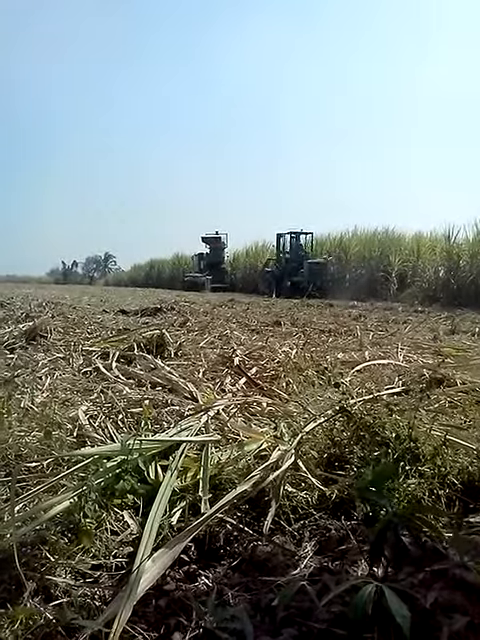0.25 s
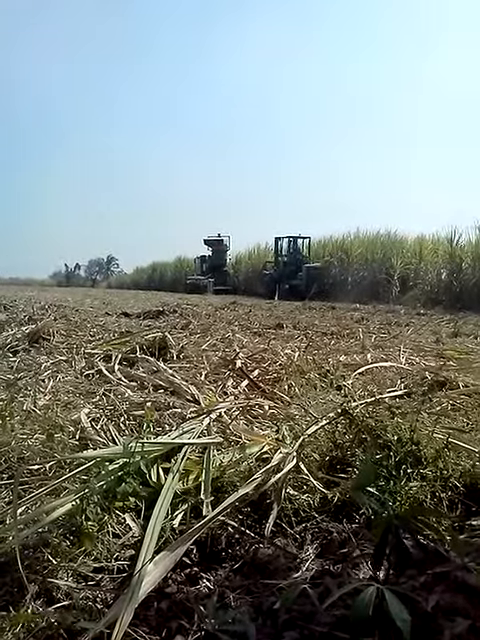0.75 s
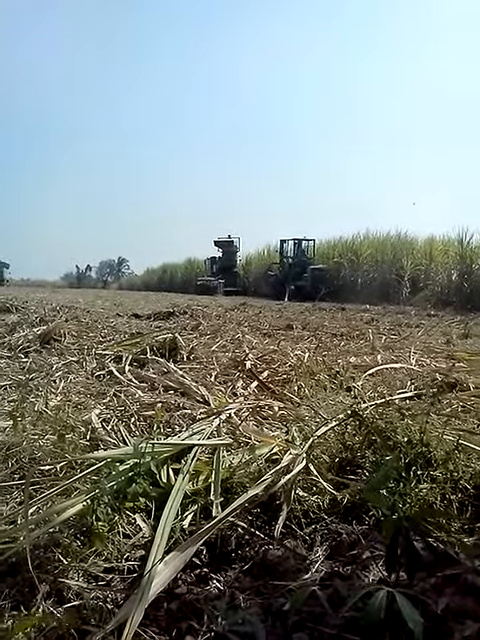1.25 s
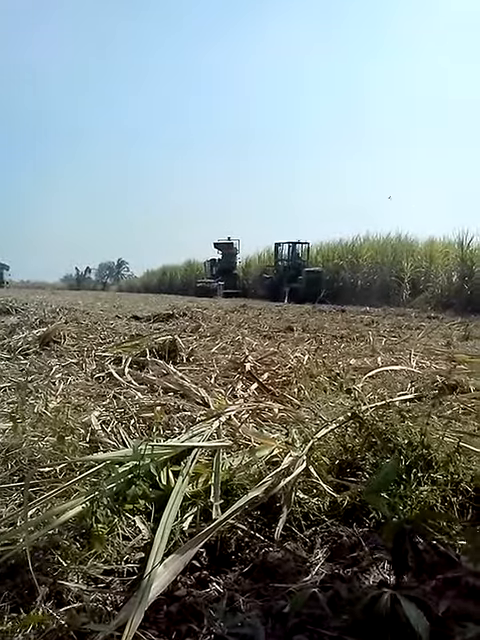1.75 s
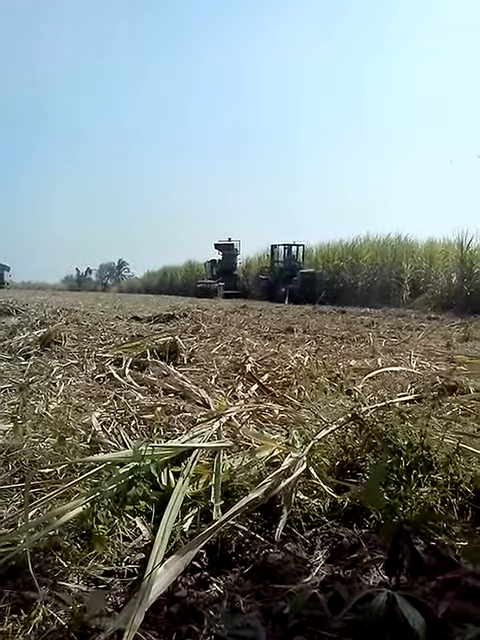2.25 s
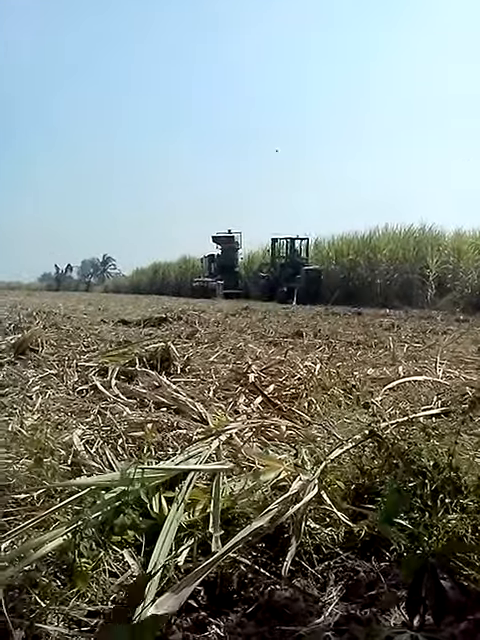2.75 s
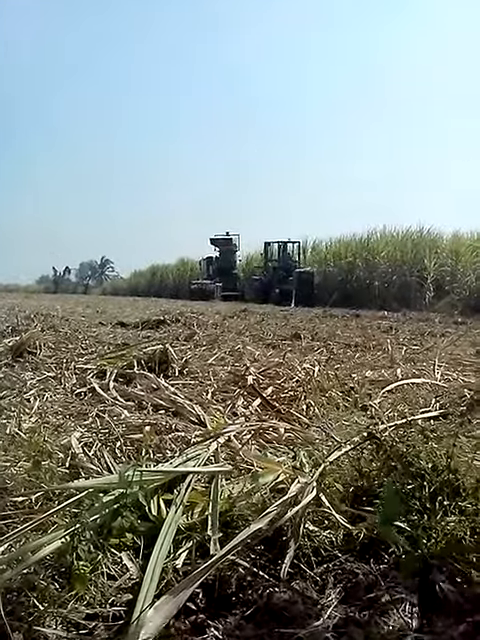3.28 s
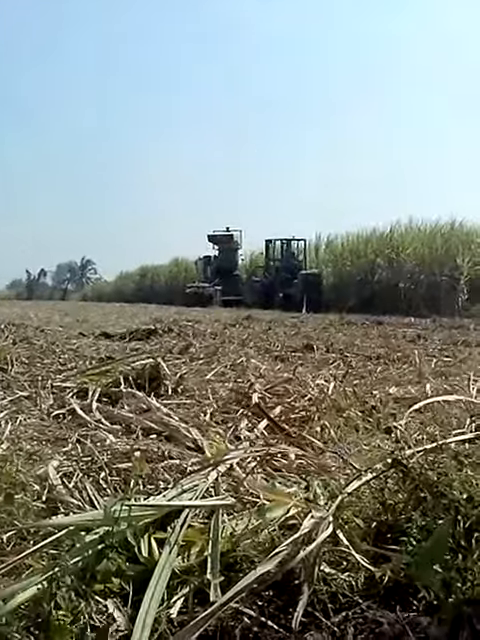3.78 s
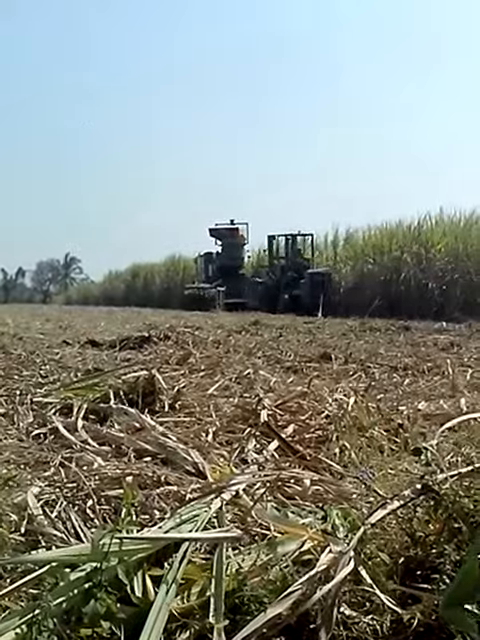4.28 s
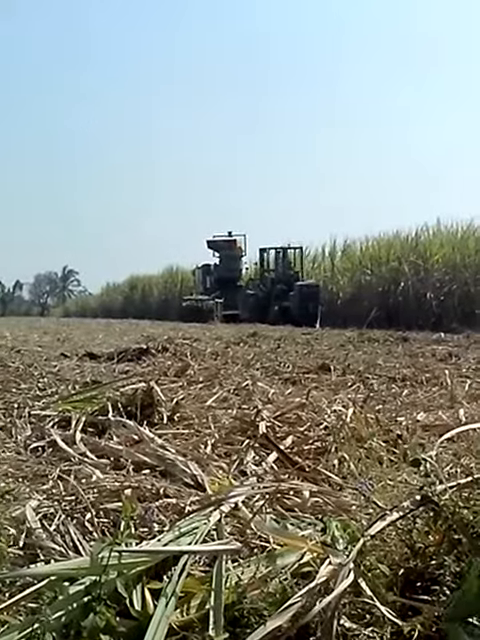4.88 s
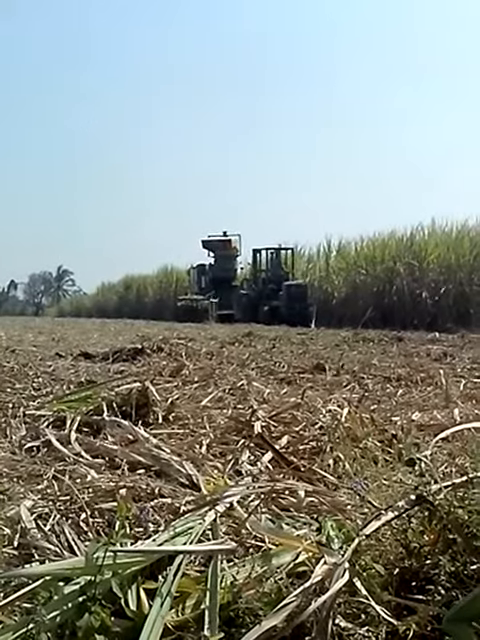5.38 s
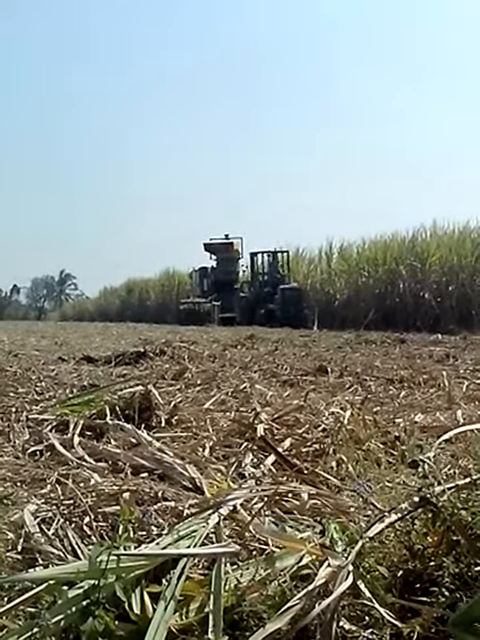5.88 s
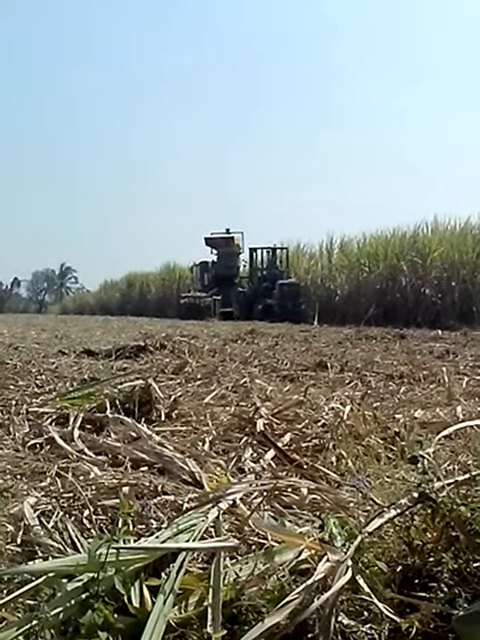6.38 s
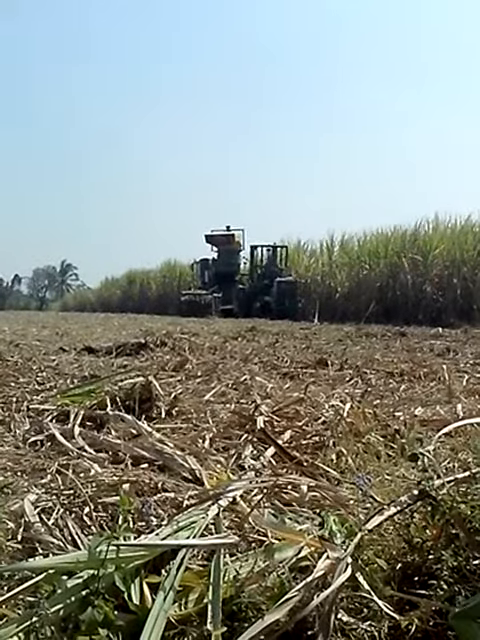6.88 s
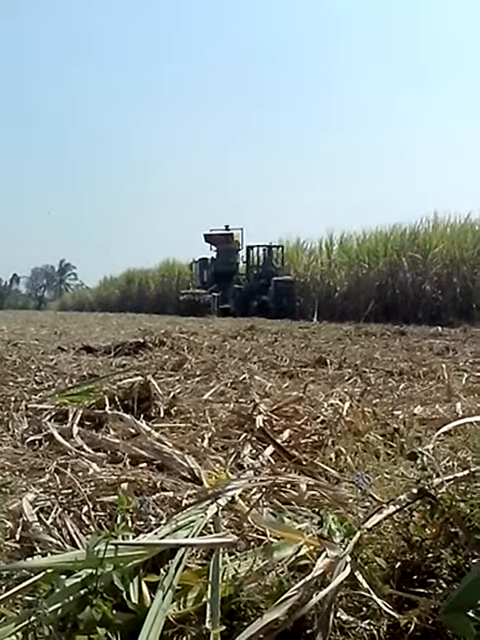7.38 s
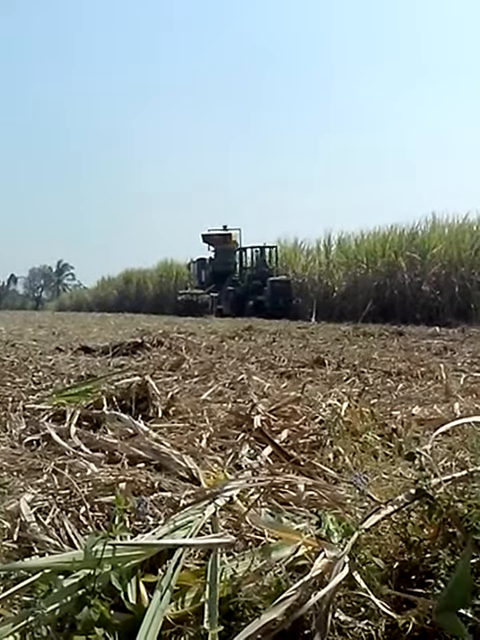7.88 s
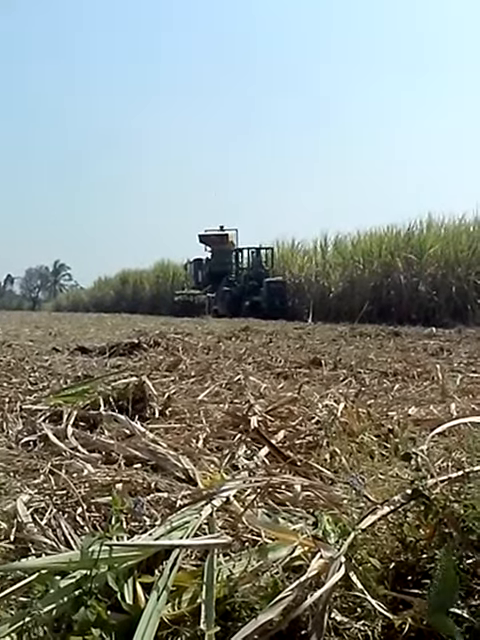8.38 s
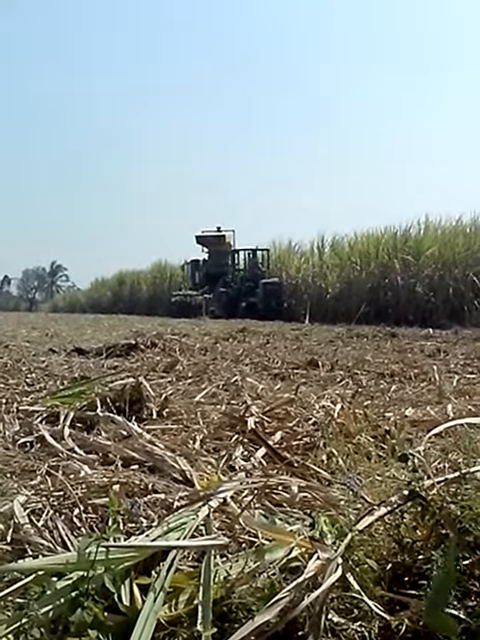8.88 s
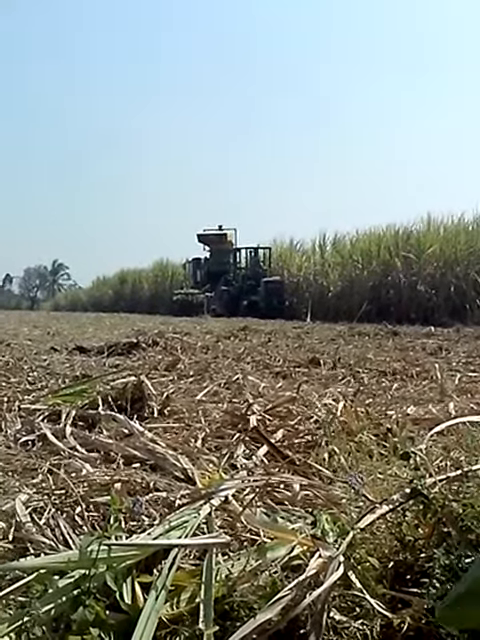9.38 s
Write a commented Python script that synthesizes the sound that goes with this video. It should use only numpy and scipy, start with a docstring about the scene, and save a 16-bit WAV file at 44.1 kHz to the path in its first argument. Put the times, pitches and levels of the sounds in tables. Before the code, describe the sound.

Two farm machines work in an open field, heard in mono with no room echo. Metallic diesel knocking, uneven and sharp, leads over broadband machine noise and leafy hiss. A cluster of dull bumps hits the microphone before two seconds, another at three. The harvester then drops in speed and gradually fades; the tractor drone rises in pitch, the blower briefly surges, and a faint dry crack ends it.

```python
"""A hard, rattling diesel knock comes first: a sugarcane harvester works beside a tractor across a stubble field.
Each firing is a noise burst in cylinder resonances; exhausts and fan are harmonic sums locked to rotation.
Halfway the harvester slows and its fan hum sinks, while the tractor speeds up.
Blowers, cutters and leaves are coloured noise; the blower surges once, cutters and leaves rise or dip
with bundles of cane. Low damped swings thump the microphone, and a dry stalk snaps near the end."""
import sys
import numpy as np
from scipy import signal
from scipy.fft import rfft, irfft, next_fast_len
from scipy.io import wavfile
from scipy.ndimage import uniform_filter1d, map_coordinates

SR = 44100
rng = np.random.default_rng(int(sys.argv[2]) if len(sys.argv) > 2 else 0)


def store_wav(level_fs):
    """Save 16-bit WAV to argv[1]."""
    pcm = np.round(np.clip(np.atleast_2d(level_fs), -1, 1) * 32767)
    wavfile.write(sys.argv[1], SR, pcm.T.astype(np.int16))


N = 425565
SECONDS = np.arange(N) / SR
FULL_SPEED = 46  # the harvester's working speed, firings per second


def amp(db):
    """Decibel law: 20 dB is a factor of ten in amplitude."""
    return 10 ** (np.asarray(db) / 20)


def unit(x):
    """Normalisation to an effective (rms) value of 1."""
    return x / np.sqrt(np.mean(x ** 2) + 1e-20)


def curves(rows):
    """Linear interpolation in time: one value per sample for each column after t/s."""
    s, *columns = np.transpose(rows)
    return [np.interp(SECONDS, s, column) for column in columns]


def wobble(rate):
    """Band-limited fluctuation: a smooth random curve through `rate` knots a second."""
    knots = rng.standard_normal(2048)
    return map_coordinates(knots, [SECONDS * rate], mode="wrap")


def swell(s, half_length):
    """Gaussian envelope: a smooth rise to 1 at s and fall, down to 1/e after half_length seconds."""
    return np.exp(-((SECONDS - s) / half_length) ** 2)


def fading(start_db, db_per_s):
    """Exponential decay: the level in dB sinks evenly as the machines work their way along the row."""
    return start_db - db_per_s * SECONDS


def filtered(x, response):
    """Linear filtering: the spectrum of x times a response of frequency."""
    size = next_fast_len(N + 8192)
    f = np.fft.rfftfreq(size, 1 / SR)
    return irfft(rfft(x, size) * response(f), size)[:N]


def rush(spectrum, patchy_db):
    """Turbulence noise: rms 1, coloured by a spectrum, random gain in patches of time and frequency."""
    cells = signal.stft(rng.standard_normal(N), nperseg=1024)[2]
    across_frequency = uniform_filter1d(rng.standard_normal(cells.shape), size=6, axis=0)
    patches = unit(uniform_filter1d(across_frequency, size=10, axis=1))
    noise = signal.istft(cells * amp(patchy_db * patches), nperseg=1024)[1][:N]
    hz, db = np.transpose(spectrum)
    return unit(filtered(noise, lambda f: amp(np.interp(np.log(f + 1), np.log(hz), db))))


def fuzzy(hz, width_hz):
    """Quadrature modulation: two random curves on cosine and sine make a narrow noise band around hz."""
    phase = 2 * np.pi * np.cumsum(hz * np.ones(N)) / SR
    return wobble(width_hz) * np.cos(phase) + wobble(width_hz) * np.sin(phase)


def hum(hz, orders, waver_db, drift):
    """Harmonic synthesis: multiples of a turning rate waver in level and phase on their way over the field."""
    turns = np.cumsum(hz) / SR
    total = 0
    for multiple, db in orders:
        level = db + waver_db * wobble(7.6)
        phase = 2 * np.pi * (multiple * turns + rng.random()) + drift * wobble(13)
        total = total + amp(level) * np.sin(phase)
    return np.sqrt(2) * total


def radiated(x, mouth_hz):
    """Radiation from a small aperture: a pipe's narrow mouth gives off little of the lowest orders."""
    return filtered(x, lambda f: 1 - 1 / (1 + (f / mouth_hz) ** 6))


def ring(bursts, modes, scale, vary_db=1.0):
    """Resonance: each row excites modes of random strength, tuned by scale; its loudest 9 ms get rms 1."""
    f = np.fft.rfftfreq(bursts.shape[1], 1 / SR) / scale
    luck = vary_db * rng.standard_normal((512, len(modes)))[:len(bursts)]
    body = 0
    for k, (centre, width, db) in enumerate(modes):
        strength = (-1) ** k * amp(db + luck[:, k, None])
        body = body + strength * 1j * f * width / (centre ** 2 - f ** 2 + 1j * f * width)
    rung = irfft(rfft(bursts) * body)
    power = uniform_filter1d(rung ** 2, size=400, axis=1)
    return rung / np.sqrt(power.max(axis=1, keepdims=True))


def place(times, rows):
    """Superposition: the sum of the rows, each starting at its time."""
    starts = np.round(np.maximum(times, 0) * SR).astype(int)
    index = starts[:, None] + np.arange(rows.shape[1])
    return np.bincount(index.ravel(), rows.ravel(), N)[:N]


# Spectral density of the low rumble: f/Hz, relative level/dB
RUMBLE_SPECTRUM = [(20, -59.5), (38, -45.5), (60, -31.5), (90, -6), (120, 1.5), (150, 4), (190, 0.5),
                   (250, -6.5), (330, -10.5), (420, -17), (560, -26), (900, -64)]


def rumble(harvester_db_per_hz=0.22, tractor_db_per_hz=0.2734, lumps_db=0.73):
    """Noise growing with rotation rate: a lumpy low rumble follows the speed of both engines."""
    speed, tractor_hz = curves(ENGINE_SPEED)[0], curves(TRACTOR_NOTE)[0]
    effort_db = harvester_db_per_hz * (speed - FULL_SPEED)
    effort_db = effort_db + tractor_db_per_hz * (tractor_hz - tractor_hz[0])
    level = fading(start_db=-33.5, db_per_s=0.92) + effort_db + lumps_db * wobble(9)
    return amp(level) * rush(RUMBLE_SPECTRUM, patchy_db=1.1)


# Spectral densities of blower, cutters and leaf hiss: f/Hz, relative level/dB
BLOWER_SPECTRUM = [(250, -37), (470, -12.5), (560, -11.5), (680, -7), (800, -4), (950, -12), (1100, -4),
                   (1240, 0.5), (1380, -3.5), (1550, -12.5), (2000, -21), (4000, -67)]
CUTTER_SPECTRUM = [(1000, -20.5), (1550, -7.5), (1750, -1), (1980, 5), (2200, -1.5), (2380, 0),
                   (2600, -8.5), (3000, -6), (3300, -12.5), (4200, -8), (6000, -51)]
HISS_SPECTRUM = [(2500, -18), (3350, -3.5), (3650, 4.5), (4100, 6), (4600, 2.5), (5050, 7), (5500, 1),
                 (5850, -5.5), (6150, 1.5), (6600, -5.5), (7100, -6.5), (7450, -12.5), (7950, -29.5),
                 (8700, -36)]
# Leaf hiss between the bundles: t/s, level/dB
LEAF_LEVEL = [(0, -44.5), (3.7, -48.5), (6, -47.5), (6.8, -47.5), (7.4, -48), (8.5, -50), (9.65, -47)]
# Thick bundles of cane in the cutters: t/s at the height, half length/s, cutter change/dB, leaf change/dB
CANE_BUNDLES = [(.1, 0.36, 0, 3.5), (1.0, 0.31, -2, 4), (1.954, 0.59, 3.5, 2), (2.802, .18, 1.5, 6),
                (4.25, 0.43, 2, -1.5), (7.497, 0.5, 2, 0)]
# The blower's one surge: t/s at the height, half length/s, rise/dB
BLOWER_SURGE = [(7.454, .5, 3)]


def machinery(throb=.15, cutter_db_per_hz=0.23):
    """Modulated noise: the blower surges once, cutters throb with firings; cutters and leaves vary with bundles."""
    speed, = curves(ENGINE_SPEED)
    firing = np.sin(2 * np.pi * np.cumsum(speed) / SR)
    blower_db = fading(start_db=-38.0, db_per_s=0.94)
    for s, half, db in BLOWER_SURGE:
        blower_db = blower_db + db * swell(s, half)
    cutter_db = fading(start_db=-38.5, db_per_s=0.65) + cutter_db_per_hz * (speed - FULL_SPEED)
    hiss_db, = curves(LEAF_LEVEL)
    for s, half, cut_db, leaf_db in CANE_BUNDLES:
        cutter_db = cutter_db + cut_db * swell(s, half)
        hiss_db = hiss_db + leaf_db * swell(s, half)
    blower = amp(blower_db + 0.23 * wobble(8)) * rush(BLOWER_SPECTRUM, patchy_db=0.56)
    cutter = amp(cutter_db + 0.4 * wobble(12)) * rush(CUTTER_SPECTRUM, patchy_db=0.25)
    hiss = amp(hiss_db + 0.67 * wobble(12)) * rush(HISS_SPECTRUM, patchy_db=2.0)
    return blower + (1 + throb * firing) * cutter + hiss


# Whines of the cutting gear: f/Hz, width/Hz, relative level/dB
GEAR_WHINES = [(462.5, 20, -59.5), (829, 30, -60), (1218, 30, -58), (1255, 40, -63)]


def gear_whine(fade_db=0.88):
    """Narrow-band noise: faint rough tones from the cutting gear die down by fade_db each second."""
    tones = sum(amp(db) * fuzzy(hz, width) for hz, width, db in GEAR_WHINES)
    return amp(fade_db * (5.5 - SECONDS)) * tones


# Spectral density of the churning air: f/Hz, relative level/dB
CHURN_SPECTRUM = [(30, -48), (60, -18), (95, 6), (160, 0.5), (300, -8.5), (450, -18.5), (900, -62)]


def buffeting(below_db=-15, half_length=0.037, lag_s=0.011):
    """Incoherent addition of power: air churns briefly at the microphone around each thump."""
    power = sum((amp(db) * swell(s + lag_s, half_length)) ** 2 for s, db, hz, loss_db in THUMP_BLOWS)
    return amp(below_db) * np.sqrt(power) * rush(CHURN_SPECTRUM, patchy_db=2.5)


# Low thumps on the microphone: t/s, relative level/dB, f/Hz, loss per rebound/dB
THUMP_BLOWS = [(0.181, -26, 156, 4), (1.349, -23.5, 150, 3), (1.479, -16, 300, 18), (1.485, -11, 149, 4.5),
               (1.553, -14, 160, 20), (1.665, -24, 553, 18), (1.726, -19, 174, 6), (1.832, -11.5, 173, 7),
               (1.901, -14, 230, 18), (1.956, -14, 132, 25), (3.014, -14.5, 139, 3), (7.422, -24.5, 145, 6),
               (8.139, -20.5, 139, 0.5), (8.597, -25.5, 141, 16)]
REBOUND_S = .035  # from a thump to its rebound, and on to the next


def thumps(cycles=1.0, gain_db=-1.4, edge_db=-11, edge_pitch=1.57, edge_cycles=0.7, linger=1.16, count=3):
    """Damped oscillation: each soft blow swings a few low cycles with a higher edge, then rebounds more weakly."""
    blows = [(s + k * REBOUND_S, db - k * loss_db, hz)
             for s, db, hz, loss_db in THUMP_BLOWS for k in range(count)]
    s, db, hz = np.transpose(blows)
    t = np.arange(-1024, 2048) / SR
    slow = np.where(t > 0, linger, 1)  # the fall takes longer than the rise

    def swing(turns, life):
        """Gaussian wave packet: a cosine of random phase under a bell lasting about `life` cycles each way."""
        phase = 2 * np.pi * (turns + rng.random((len(s), 1)))
        return np.exp(-(turns / (life * slow)) ** 2) * np.cos(phase)

    turns = hz[:, None] * t
    body = swing(turns, cycles)
    edge = amp(edge_db) * swing(edge_pitch * turns, edge_cycles)
    return place(s + t[0], amp(db + gain_db)[:, None] * (body + edge))


# Cracks of a dry stalk: t/s, relative level/dB, time to fall 60 dB/s
STALK_CRACKS = [(9.434, -30, .02), (9.438, -30, .015), (9.446, -28, .012)]
# Resonances of the stalk: f/Hz, width/Hz, relative level/dB
STALK_MODES = [(1300, 1600, -15), (4770, 200, -5), (6120, 140, 0), (7200, 170, -5.5)]


def stalk():
    """Impulsive excitation: fibres break in quick, bright cracks that ring the stalk's resonances."""
    s, db, decay = np.transpose(STALK_CRACKS)
    t = np.arange(2048) / SR
    bursts = amp(-60 * t / decay[:, None]) * rng.standard_normal((len(s), len(t)))
    return place(s, amp(db - 4)[:, None] * ring(bursts, STALK_MODES, 1))


# The tractor's exhaust: t/s, note f/Hz, level/dB
TRACTOR_NOTE = [(0, 74.1, -58), (5.75, 74.1, -53), (6.6, 93.4, -53), (7, 102.8, -49), (9.65, 104.3, -43.5)]
# Its partials: multiple of the note, relative level/dB
TRACTOR_PARTIALS = [(.5, -18), (1, 0), (2, -9), (3, -15)]


def tractor():
    """Harmonic exhaust note: a low drone climbs as the tractor speeds up."""
    hz, db = curves(TRACTOR_NOTE)
    drone = hum(hz, TRACTOR_PARTIALS, waver_db=0.5, drift=0.23)
    return radiated(amp(db) * drone, mouth_hz=56.7)


# The turbocharger's loudness: firing rate f/Hz, level/dB
TURBO_LEVEL = [(36, -73), (41, -55), (46, -61), (48, -59)]


def turbo(width_hz=200, whistle_hz=6850, rise_per_firing=30, sag_hz_per_s=55, flutter_db=2):
    """Narrow-band noise of moving pitch: a fuzzy, fluttering whistle sags and drops with engine speed."""
    speed, = curves(ENGINE_SPEED)
    hz = whistle_hz + rise_per_firing * (speed - FULL_SPEED) - sag_hz_per_s * SECONDS
    level = np.interp(speed, *np.transpose(TURBO_LEVEL)) + flutter_db * wobble(14)
    return amp(level) * fuzzy(hz, width_hz)


# Ordinary firings: t/s, relative level/dB
CLATTER_LEVEL = [(0, -32.5), (.65, -35.5), (1.6, -31.5), (2.85, -33), (3.1, -39), (4.52, -37), (4.7, -44.5),
                 (5.6, -36.5), (6.35, -39.5), (6.85, -42.5), (7.75, -41.5), (8.6, -51.5), (9.65, -57)]
# Hardest firings: t/s, relative level/dB
HARD_KNOCKS = [(0.825, -31.5), (.955, -29.5), (1.172, -30), (1.43, -30.5), (1.517, -27.5), (1.65, -29.5),
               (1.693, -29.5), (1.91, -28.5), (1.954, -26.5), (2.042, -28.5), (2.108, -28.5), (2.219, -29),
               (2.482, -26), (2.927, -29.5), (4.418, -33.5), (5.561, -33), (6.034, -27), (6.098, -34),
               (6.127, -31.5), (6.158, -29.5), (6.289, -31), (6.415, -33), (7.036, -35), (7.241, -33),
               (7.445, -31), (7.851, -34.5)]
# Cylinder resonances at the starting speed: f/Hz, width/Hz, relative level/dB
CYLINDER_MODES = [(2030, 306, -16), (2910, 360, -21.5), (3160, 380, -21.5), (3626, 71, -3.5),
                  (3997, 70, -2), (4300, 69, -3), (4710, 59, -12.5), (4960, 133, -12.5), (5374, 210, -17),
                  (6100, 120, -21.5), (6775, 100, -17.5), (7490, 120, -30.5), (8680, 140, -55)]


def diesel_knock(speed, scatter_db, uneven_db, usual_db, hard_db, harsh_db=1.2,
                 rise=0.0014, decay=0.032, tail_db=-19, tail_decay=0.12, cooling=0.06):
    """Forced resonance: every firing is a short noisy burst ringing the cylinder's modes."""
    at = np.flatnonzero(np.diff(np.floor(np.cumsum(speed) / SR)))
    times, order = at / SR, np.arange(len(at))
    hard_s, hard_level = np.transpose(HARD_KNOCKS)
    hard = abs(times - hard_s[:, None]).argmin(axis=1)
    # every other firing is stronger, in step with the nearest hardest one, and some of these are harsher
    strong = (-1) ** abs(order - hard[:, None]).min(axis=0)
    harsh = harsh_db * (strong > 0) * np.minimum(rng.exponential(size=512), 2)[order]
    scatter = scatter_db * rng.standard_normal(512)[order]
    level = curves(CLATTER_LEVEL)[0][at] + usual_db + uneven_db * strong + harsh + scatter
    times[hard], level[hard] = hard_s, hard_level + hard_db
    t = np.arange(2048) / SR
    onset = 1 - np.exp(-(t / rise) ** 2)
    # both decays are the seconds to fall 60 dB
    shape = onset * (amp(-60 * t / decay) + amp(tail_db - 60 * t / tail_decay))
    bursts = shape * rng.standard_normal((512, len(t)))[order]
    # at low speed the gas is cooler and rings a little lower
    scale = (speed[at] / speed[0]) ** cooling
    return place(times, amp(level)[:, None] * ring(bursts, CYLINDER_MODES, scale[:, None]))


# The harvester's diesel: t/s, firing rate f/Hz
ENGINE_SPEED = [(0, 45.84), (.54, 48.09), (.97, 46.28), (2.31, 45.46), (2.54, 44.38), (2.99, 46.32),
                (3.42, 44.94), (3.96, 45.05), (4.73, 41.69), (5.44, 33.46), (5.75, 34.86), (6.19, 30.85),
                (6.66, 33.55), (7.04, 29.58), (7.77, 29.34), (7.94, 32.17)]
# Its exhaust partials: multiple of the firing rate, relative level/dB
EXHAUST_PARTIALS = [(2, -41), (3, -40.5), (4, -44), (6, -53.5), (9, -62)]
# The fan's loudness: firing rate f/Hz, level/dB
FAN_LEVEL = [(32, -46.5), (37.5, -39.5), (46, -40)]
FAN_RATIO = 4.74  # blade passages per firing


def harvester(effort_db=14):
    """Phase-locked sources: knock, exhaust and fan hum follow the crankshaft; hums fade as it slows."""
    speed, = curves(ENGINE_SPEED)
    effort = amp(effort_db * (speed / speed[0] - 1))
    puffs = effort * hum(speed, EXHAUST_PARTIALS, waver_db=4.0, drift=0.12)
    fan_level = amp(np.interp(speed, *np.transpose(FAN_LEVEL)))
    fan = fan_level * hum(FAN_RATIO * speed, [(1, 0.0053)], waver_db=2.5, drift=0.34)
    knock = diesel_knock(speed, scatter_db=1.66, uneven_db=1.57, usual_db=-1.6, hard_db=1.4)
    return radiated(puffs, mouth_hz=96) + fan + knock


def scene():
    """Linear superposition: machines, cutting gear and small sounds at the microphone add up in mono."""
    background = rumble() + machinery() + gear_whine()
    small_sounds = buffeting() + thumps() + stalk()
    engines = tractor() + turbo() + harvester()
    return (background + small_sounds + engines)[None]


TOP_HZ = 8750  # upper band limit


def record(dry):
    """Low-pass filtering: a very steep slope leaves almost nothing above the band limit."""
    return filtered(dry[0], lambda hz: 1 / np.sqrt(1 + (hz / TOP_HZ) ** 160))[None]


dry = scene()
out = record(dry)
store_wav(out)
```